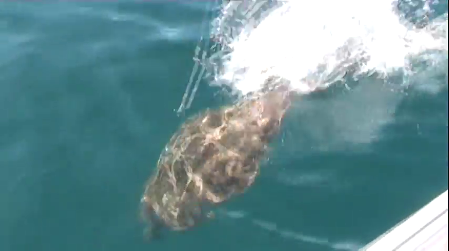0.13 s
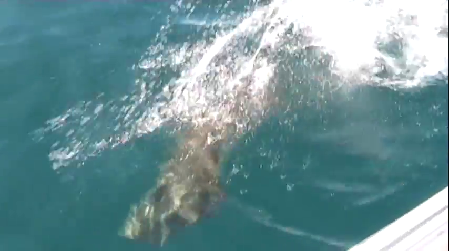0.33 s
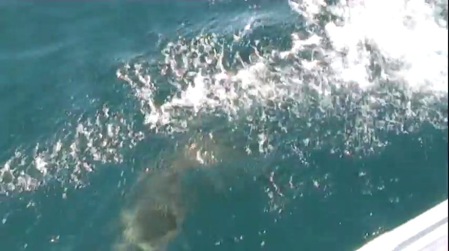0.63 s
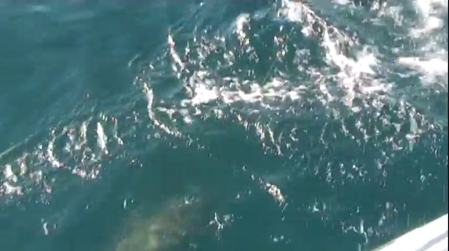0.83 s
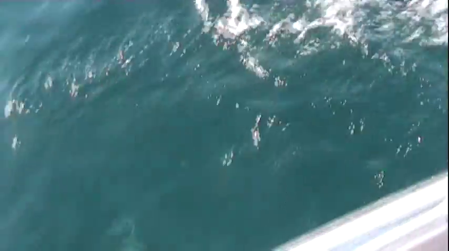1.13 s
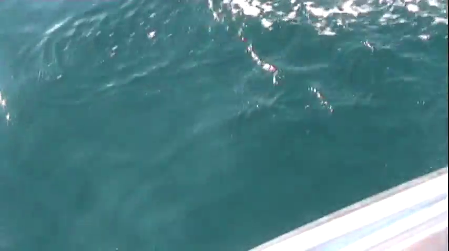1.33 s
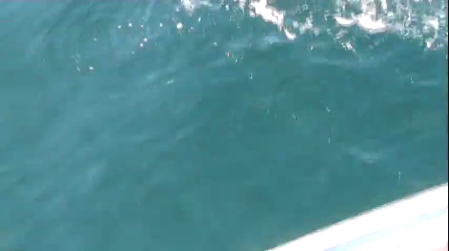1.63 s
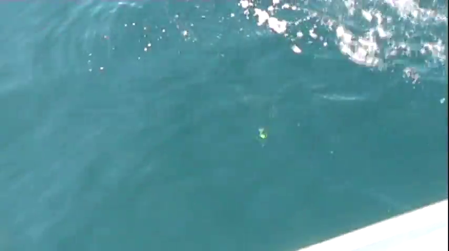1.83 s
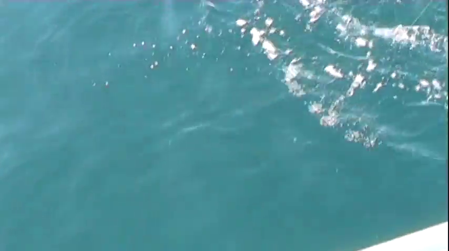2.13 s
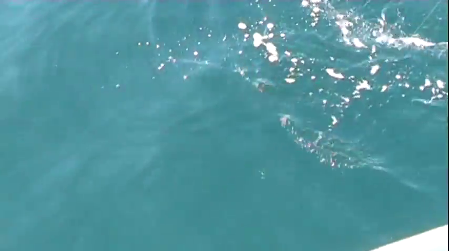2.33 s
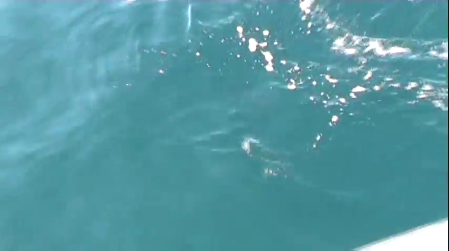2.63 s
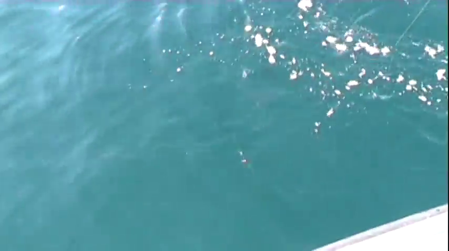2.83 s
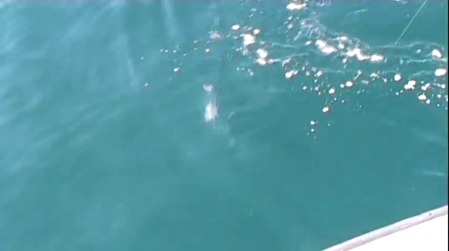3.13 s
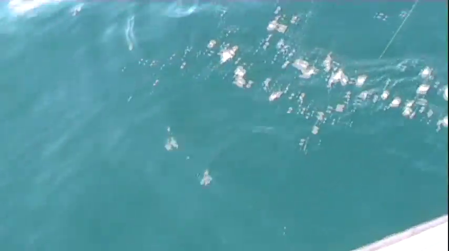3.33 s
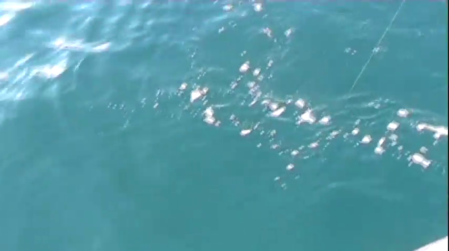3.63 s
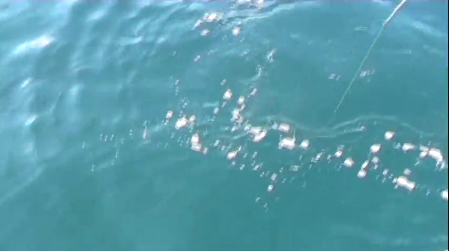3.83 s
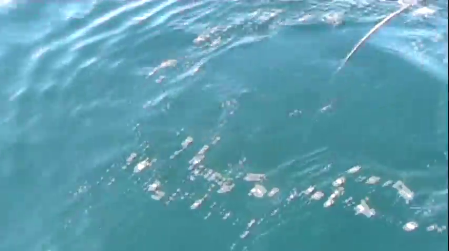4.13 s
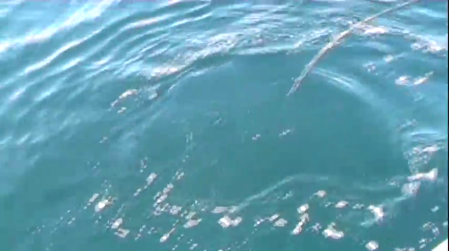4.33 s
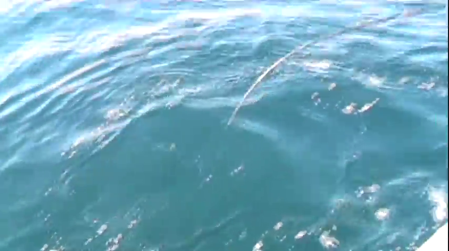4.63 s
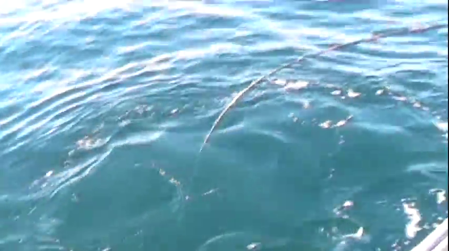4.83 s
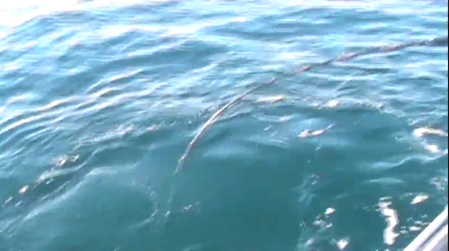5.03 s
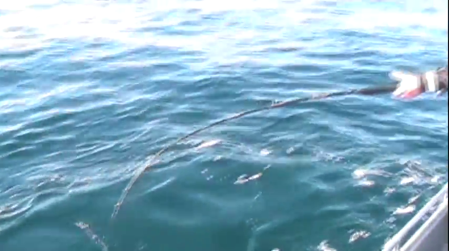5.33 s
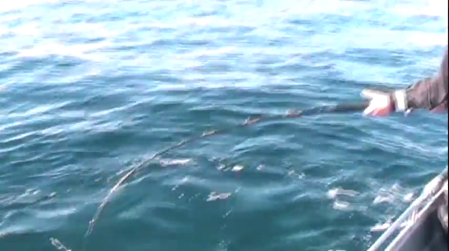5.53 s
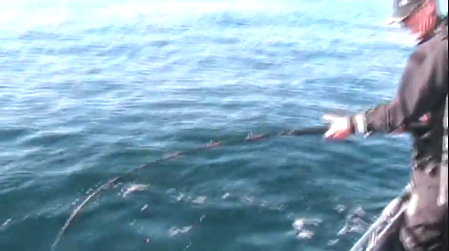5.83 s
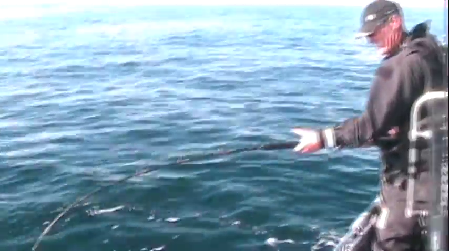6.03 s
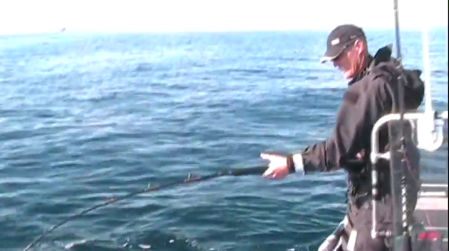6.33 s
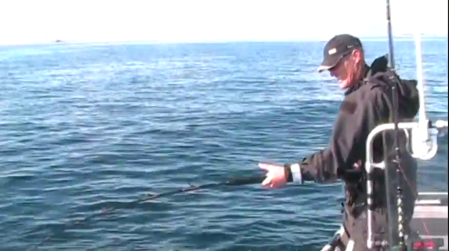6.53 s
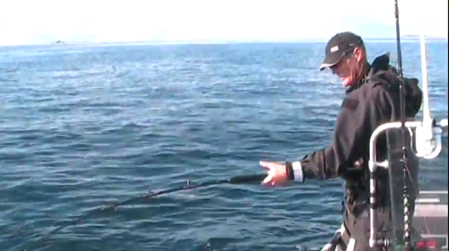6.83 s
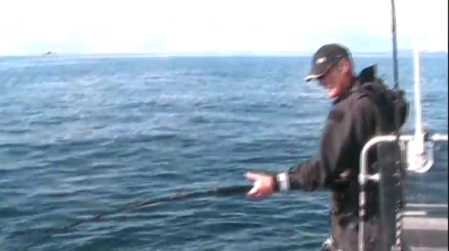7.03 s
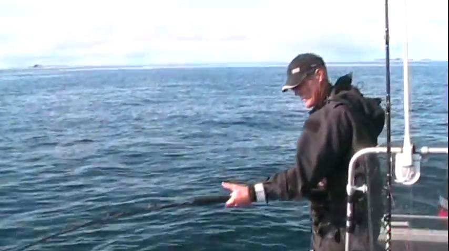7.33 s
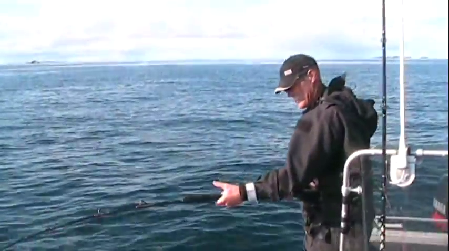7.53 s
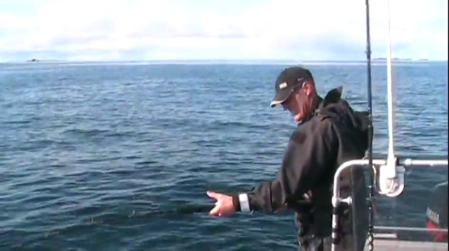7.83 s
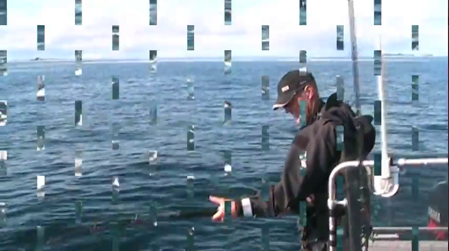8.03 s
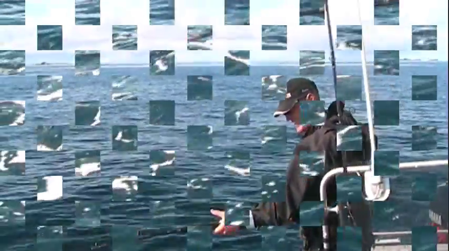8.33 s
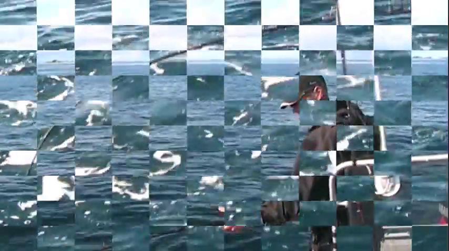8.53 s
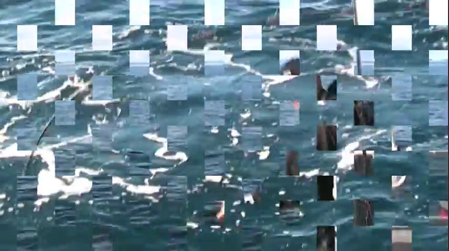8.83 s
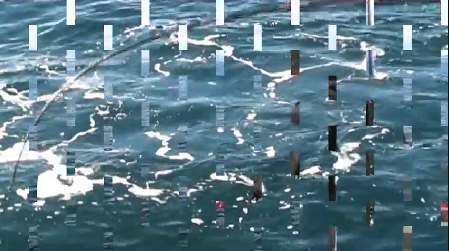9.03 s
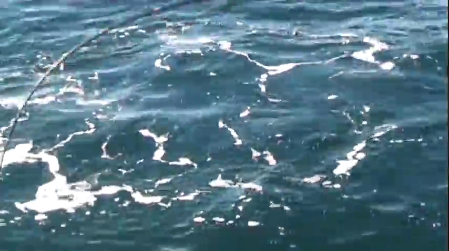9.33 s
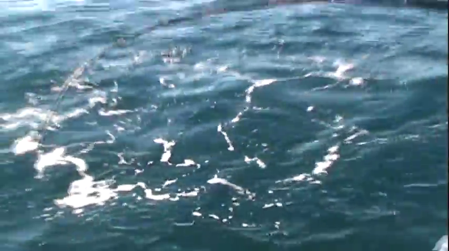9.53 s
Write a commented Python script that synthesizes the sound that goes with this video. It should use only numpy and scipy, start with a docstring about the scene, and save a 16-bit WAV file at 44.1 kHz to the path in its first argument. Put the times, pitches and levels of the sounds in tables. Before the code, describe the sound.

A big fish thrashes and splashes beside a boat, then a fishing reel's ratchet whines in three surging, slowing runs over lapping water.

```python
"""Hooked fish stripping a reel

A big fish thrashes free of the surface beside a boat and dives, pulling line off a reel in three runs.
The reel's pawl snaps over the ratchet teeth, a rattle when slow and a whine when fast: impulses timed by
the spool's speed excite the frame, the housing, the side plate and the spool. Spray of filtered noise falls back,
and small waves of noise, ringing air pockets and a few knocks gulp at the hull, near two close microphone ports."""
import sys
import numpy as np
from scipy import signal
from scipy.fft import rfft, irfft, next_fast_len
from scipy.io import wavfile
from scipy.ndimage import uniform_filter1d, map_coordinates

SR = 44100
rng = np.random.default_rng(int(sys.argv[2]) if len(sys.argv) > 2 else 0)


def store_wav(level_fs):
    """Save 16-bit WAV to argv[1]."""
    pcm = np.round(np.clip(np.atleast_2d(level_fs), -1, 1) * 32767)
    wavfile.write(sys.argv[1], SR, pcm.T.astype(np.int16))


N = 427769
TIME = np.arange(N) / SR

TEETH = 18  # ratchet teeth per turn of the spool
CRUISE_PER_S = 200  # teeth per second at which the exposure levels hold
# the fish's three runs, each a dash and a long coast: (time [s], speed [ratchet teeth per s])
RUNS = [(0.454, 87.2), (0.702, 156.7), (0.858, 236.4), (1.158, 218.9), (1.37, 263.9), (1.546, 253.5),
        (1.679, 286.8), (2.314, 210.7), (2.779, 198.2), (3.052, 164.3), (3.658, 139.5), (4.178, 105.4),
        (4.228, 76.9), (4.28, 117.0), (4.538, 110.2), (4.946, 67.0), (5.538, 68.0), (5.62, 199.6),
        (5.767, 158.9), (5.965, 240.8), (6.246, 280.7), (6.459, 273.5), (7.089, 196.2), (7.79, 116.9),
        (8.312, 71.9), (8.513, 70.9), (8.577, 187.5), (8.716, 148.9), (8.855, 199.3), (9.153, 202.9),
        (9.7, 154.0)]
# loudness of the reel at cruising speed, as it turns and the hand shades it:
# (time [s], snaps [dB], hum [dB], share of the housing's upper resonances [dB])
EXPOSURE = [(.5, -21.5, -32, 11), (1.35, -23.5, -30, 1.5), (1.8, -25, -32.5, 3), (2.2, -24.5, -33, 3),
            (4.4, -24.5, -33, 3), (5.35, -24, -35, 2.5), (5.9, -22.5, -33, 1), (6.55, -23.5, -31.5, 5),
            (7.3, -21.5, -31.5, 5), (8, -21.5, -33.5, 5.5), (8.35, -22.5, -38, 6), (8.53, -25.5, -39, 1),
            (8.6, -27.5, -42, -2), (8.75, -25, -39.5, -2), (9.3, -19.5, -36, 2), (9.7, -19.5, -34, 3)]


def amp(db):
    """Decibels to gain."""
    return 10 ** (np.asarray(db) / 20)


def evened(x):
    """Scales to rms 1."""
    return x / np.sqrt(np.mean(x ** 2) + 1e-20)


def steadied(x, size=3000):
    """Scales to a running rms of about 1, smoothed twice over size samples."""
    power = uniform_filter1d(uniform_filter1d(x ** 2, size), size)
    return x / np.sqrt(abs(power) + 1e-6 * np.mean(x ** 2))


def curve(rows, order=1):
    """One column of a time table at every sample."""
    rows = np.asarray(rows)
    return np.interp(TIME, rows[:, 0], rows[:, order])


def bumps(rows):
    """Sum of bell-shaped bumps."""
    return sum(height * np.exp(-((TIME - s) / width) ** 2) for s, height, width in rows)


def drift(per_s):
    """Smooth random wander of rms 1."""
    knots = np.arange(0, 10, 1 / per_s)
    return evened(np.interp(TIME, knots, rng.standard_normal(len(knots))))


def swells(rows, rise_db_per_s):
    """Gain of overlapping surges that each rise, hold and fade."""
    power = 0
    for s, db, hold, fade in rows:
        before = np.maximum(s - TIME, 0)
        after = np.maximum(TIME - s - hold, 0)
        power = power + amp(db - rise_db_per_s * before - fade * after) ** 2
    return np.sqrt(power)


def read(points, hz):
    """A spectrum on a log-frequency axis."""
    f, value = np.transpose(points)
    return np.interp(np.log(hz + 1), np.log(f + 1), value)


def colour(x, points, size=2048):
    """Causal minimum-phase filter with the given spectrum."""
    db = np.maximum(read(points, abs(np.fft.fftfreq(size, 1 / SR))), -90)
    taps = np.fft.ifft(np.exp(np.conj(signal.hilbert(np.log(amp(db)))))).real
    return signal.oaconvolve(x, taps)[:N]


def sing(x, hz, width):
    """A steep resonance that follows a moving pitch: shift to 0 Hz, smooth, shift back."""
    turn = np.exp(2j * np.pi * np.cumsum(hz) / SR)
    r = np.exp(-np.pi * width / SR)
    smooth = signal.lfilter([(1 - r) ** 2], [1, -2 * r, r * r], x / turn + 1e-18)
    return (turn * smooth).real


def clicks(s, size):
    """Impulses at exact times, placed between samples by a windowed sinc."""
    at = np.clip(s * SR, 0, N + 8)
    near = at.astype(int)[:, None] + np.arange(-3, 5)
    offset = near - at[:, None]
    weight = size[:, None] * np.sinc(offset) * np.sinc(offset / 4)
    return np.bincount(abs(near).ravel(), weight.ravel(), N)[:N]


def add(mix, s, sound):
    """Adds a sound at time s."""
    part = mix[max(round(s * SR), 0):][:len(sound)]
    part += sound[:len(part)]


def scatter(x, t60):
    """A dense, short spray of reflections: decaying noise as an impulse response."""
    t = np.arange(SR // 8) / SR
    tail = rng.standard_normal(len(t)) * amp(-60 * t / t60)
    return signal.oaconvolve(x, tail / np.linalg.norm(tail))[:N]


def rumble():
    """A faint low rumble of filtered noise."""
    # (frequency [Hz], density [dB per Hz])
    rumble_colour = [(20, -5), (70, -7), (130, -5), (250, -9), (600, -22)]
    return amp(-41.0) * evened(colour(rng.standard_normal(N), rumble_colour))


def bubble(hz, t60, rise=0.078):
    """A tone swells within a cycle, rings, and rises in pitch, as an air pocket does nearing the surface."""
    t = np.arange(int(t60 * SR)) / SR
    tone = np.sin(2 * np.pi * hz * t * (1 + rise * t / t60))
    return tone * amp(-60 * t / t60) * (1 - np.exp(-(2 * hz * t) ** 2))


def froth(per_s, spread_db):
    """Countless drops of very unequal size: sparse random impulses."""
    size = amp(spread_db * np.minimum(rng.exponential(1, N), 4))
    return evened(size * rng.standard_normal(N) * (rng.random(N) < per_s / SR))


def gurgle(per_s=220, low_hz=210, high_hz=680, cycles=14, spread_db=2.5, count=14):
    """Many small air pockets in count pitches, each ringing for a number of cycles."""
    water = np.zeros(N)
    for hz in np.geomspace(low_hz, high_hz, count):
        water += signal.oaconvolve(froth(per_s / count, spread_db), bubble(hz, cycles / hz))[:N]
    return evened(water)


def lapping():
    """Water churns along the hull as swelling noise, with ringing air pockets and a few short knocks and ticks."""
    # waves washing along the hull: (arrival [s], relative level [dB], hold [s], fade [dB per s])
    waves = [(.2, -38.5, 0.48, 110), (.98, -33.5, 0.44, 25.5), (2.55, -42, 0.046, 52), (3.7, -43, 0.36, 19),
             (4.84, -44.5, 0.029, 23), (5.75, -44, 0.22, 26), (6.5, -47.5, 0.2, 25), (7.5, -46.5, 0.092, 9),
             (7.97, -48.5, 0.51, 54), (9.1, -48, 0.3, 23)]
    # churning water: (frequency [Hz], density [dB per Hz])
    wash_colour = [(35, -83), (60, -9.5), (167, -2), (347, 2), (404, 2), (530, 3.5), (678, -2.5),
                   (1000, -0.5), (1300, -34), (2200, -120)]
    # air pockets closing in the water, with a few short knocks and ticks:
    # (time [s], peak level [dB], starting pitch [Hz], t60 [s])
    pockets_and_knocks = [(0.03, -7, 3100, 0.0033), (0.055, -11, 2320, 0.013), (.068, -19, 1580, 0.05),
                          (.081, -11, 1130, 0.03), (.116, -16.5, 916, 0.035), (0.181, -19, 417, 0.088),
                          (.197, -7, 550, 0.021), (0.216, -15, 1170, 0.053), (0.252, -11, 1420, 0.032),
                          (0.325, 1.5, 970, 0.019), (0.329, -12, 438, 0.16), (0.354, -10, 374, 0.079),
                          (.357, -8, 544, 0.022), (.366, -10, 1440, 0.039), (.372, -20, 208, 0.091),
                          (.476, -9.5, 994, 0.035), (.513, -17, 1600, 0.036), (.518, -16, 493, 0.068),
                          (.522, -17, 1020, 0.027), (.657, -20, 790, 0.033), (0.767, -18, 396, 0.042),
                          (.823, -7, 3100, .006), (.925, -21, 408, 0.1), (0.942, -16.5, 860, 0.033),
                          (0.973, -13, 383, 0.041), (1.035, -19, 480, 0.064), (1.07, -21, 420, 0.12),
                          (1.121, -22.5, 452, 0.15), (1.175, -22, 407, 0.13), (1.196, -24, 484, 0.06),
                          (1.238, -12, 1950, .012), (1.255, -25, 302, .08), (1.326, -18.5, 460, 0.035),
                          (2.039, -34, 238, 0.12), (2.553, -29, 840, 0.061), (2.62, -37, 166, 0.16),
                          (2.7, -29.5, 404, 0.2), (3.836, -13, 1130, 0.011), (3.837, -14, 463, 0.012),
                          (4.837, -18, 450, 0.055), (4.844, -15.5, 381, 0.098), (4.85, -34, 230, 0.12),
                          (5.839, -23.5, 484, 0.06), (6.588, -29, 540, 0.099), (6.595, -32, 410, .07),
                          (7.96, -31, 192, 0.19), (7.985, -27, 241, 0.14), (8.08, -42, 138, 0.39),
                          (8.357, -38, 413, 0.073), (8.435, -35, 260, 0.16), (8.44, -42, 560, 0.074),
                          (9.06, -25, 380, 0.081), (9.073, -29, 312, 0.12), (9.287, -31, 412, 0.15),
                          (9.295, -30, 720, .07)]
    churn = evened(colour(froth(per_s=2000, spread_db=-1.0), wash_colour))
    surge = swells(waves, rise_db_per_s=74) + amp(-53)  # never fully calm
    water = (amp(-3.5) * churn + amp(-9.0) * gurgle()) * surge * amp(2 * drift(25))
    gulps = np.zeros(N)
    for s, db, hz, t60 in pockets_and_knocks:
        add(gulps, s, amp(db) * bubble(hz, t60))
    return water + gulps + amp(-2) * scatter(gulps, t60=0.072)


def splash():
    """The tail slaps and throws up spray; the spray patters back and its larger drops plink."""
    # sheets of spray thrown up and falling back:
    # (arrival [s], relative level [dB], hold [s], fade [dB per s])
    sheets = [(.075, -32, 0.012, 85), (.21, -26, 0.18, 106), (.49, -25.5, 0.24, 135), (.8, -38, .01, 5)]
    # slaps of the tail: (time [s], level before colouring [dB], t60 [s])
    slaps = [(0.051, -18.5, 0.039), (.197, -26, 0.12), (0.211, -10, 0.039), (0.316, -17.5, 0.18),
             (0.325, -12, 0.078), (0.356, -21, 0.38), (0.47, -19.5, 0.12)]
    # slaps and spray: (frequency [Hz], density [dB per Hz])
    spray_colour = [(59, -38), (100, -50), (426, -6.5), (646, -21), (1040, -5), (1290, -10), (2750, -12.5),
                    (4900, -21), (7890, -17), (11500, -36.5), (15000, -98), (22000, -120)]
    spray = swells(sheets, rise_db_per_s=183)
    water = froth(per_s=7000, spread_db=-0.3) * spray * amp(3.0)
    t = TIME[:SR // 4]
    for s, db, t60 in slaps:
        add(water, s, amp(db - 60 * t / t60) * rng.standard_normal(len(t)))
    drops = gurgle(per_s=900, low_hz=520, high_hz=3520, cycles=22, spread_db=2.0, count=17)
    return evened(colour(water, spray_colour)) * np.std(water) + amp(-8.0) * spray * drops


def line():
    """Line hisses softly through the rod's guides, as filtered noise fading in once it is taut."""
    # plainer once the rod points across the microphones: (time [s], level [dB])
    hiss_level = [(4, -46), (5.5, -44), (7, -41), (8.5, -41)]
    # (frequency [Hz], density [dB per Hz])
    hiss_colour = [(900, -30), (1500, -3), (2500, 0), (6000, 0), (9000, -3), (12000, -14)]
    hiss = evened(colour(rng.standard_normal(N), hiss_colour))
    return amp(curve(hiss_level) + drift(20)) * hiss * np.clip(TIME - RUNS[0][0], 0, 1)


def spool_speed():
    """Teeth per second: the run, a jerk at each tail beat, and a drag that grips and eases once per turn."""
    # tail beats that jerk the spool, mostly as a run begins:
    # (time [s], extra speed [teeth per s], half width [s])
    tail_beats = [(0.77, 105, 0.061), (0.921, 42, 0.038), (1.035, 78, 0.064), (1.234, 97, 0.064),
                  (1.45, 63, 0.049), (1.614, 38, 0.053), (5.394, 38, 0.107), (5.888, 78, 0.04),
                  (5.99, 12, 0.03), (6.052, -30, 0.022), (6.122, 62, 0.033), (6.341, 36, 0.03)]
    # (time [s], swing of the drag [teeth per s], place in the turn [turns])
    drag_grip = [(.7, 2, .03), (1.7, 6, -.25), (2.3, 9.5, -.37), (3.1, 12, -.33), (4, 7, -.39),
                 (5.2, 4.6, -.35), (6.2, 4, -.88), (6.8, 8, -.95), (7.4, 16, -1.02), (8.3, 3, -.73),
                 (9, 21, -.87), (9.3, 4, -1.03), (9.65, 20, -.84)]
    pull = curve(RUNS) + bumps(tail_beats)
    turns = np.cumsum(pull * (TIME > RUNS[0][0])) / SR / TEETH
    drag = curve(drag_grip) * np.cos(2 * np.pi * (turns + curve(drag_grip, order=2)))
    return (pull + drag) * (1 + .007 * drift(30))


def ratchet(speed, swing_db=0.14, uneven_db=1.2, jitter_s=.000006, rebound_s=.0038, slow_hz=75,
            rebound_db=-2, rebound_jitter=0.07, rebound_fade=0.6):
    """The pawl drops off each tooth and strikes again, sooner and weaker as the spool speeds up."""
    passed = np.cumsum(speed * (TIME > RUNS[0][0])) / SR
    tooth = np.arange(1, int(passed[-1]))
    s = np.interp(tooth, passed, TIME)
    slowness = slow_hz / np.interp(s, TIME, speed)
    a, b, c, d = rng.standard_normal((len(s), 4)).T
    off_centre = swing_db * np.cos(2 * np.pi * tooth / TEETH)  # once per turn of the spool
    force = amp(uneven_db * a + off_centre)
    again = s + rebound_s * np.sqrt(slowness) * (1 + rebound_jitter * slowness * c)
    rebound_force = force * slowness ** rebound_fade * amp(rebound_db + uneven_db * d)
    return clicks(s + jitter_s * b, force), clicks(again, rebound_force)


def chatter(hits, t60):
    """Each hit frays into a decaying burst of tiny contacts, never twice the same."""
    keep = amp(-120 / (t60 * SR))  # decay of power per sample
    return np.sqrt(signal.lfilter([1 - keep], [1, -keep], hits ** 2)) * rng.standard_normal(N)


def disperse(x, delay_s=0.000901, size=2048, count=70):
    """Bending waves cross the frame at unequal speeds, which smears each blow without colouring it."""
    spread = delay_s * np.minimum(rng.exponential(1, count), 4)
    delays = np.interp(np.linspace(0, count - 1, size // 2 + 1), np.arange(count), spread)
    phase = -2 * np.pi * np.cumsum(delays) * SR / size
    taps = np.roll(irfft(np.exp(1j * phase)), size // 4)
    return signal.oaconvolve(x, taps)[size // 4:][:N]


def rattle(x, peak_s, count=4):
    """The frame answers each blow with a dense ring of a few milliseconds, whose detail shifts as the reel moves."""
    u = np.arange(SR // 25) / SR / peak_s
    answers = rng.standard_normal((count, len(u))) * np.sqrt(u) * np.exp(-u / 2)
    weights = np.array([drift(1.458) for _ in answers])
    weights /= np.linalg.norm(weights, axis=0)
    ringing = np.zeros(N)
    for weight, answer in zip(weights, answers):
        ringing += weight * signal.oaconvolve(x, answer / np.linalg.norm(answer))[:N]
    return ringing


def pawl_snaps(blows, fray, pace):
    """Frayed blows spread through the frame and radiate brightly, coloured by how the reel is held."""
    # how the reel is held: (time [s], pose [index into the five colours below])
    turns = [(1.6, 0), (2, 1), (2.62, 1), (2.82, 2), (5.45, 2), (5.75, 3), (8.3, 3), (8.9, 4)]
    # colours of the snaps as the reel turns towards the microphones: (frequency [Hz], density [dB per Hz])
    early = [(1590, -41), (2700, -7.5), (3020, -8), (3300, -11), (3930, -9.5), (4500, -1.5), (5210, -6.5),
             (5950, -4), (6300, -6), (7250, -2), (8250, -0.5), (9200, -9.5), (10800, -16), (11400, -38),
             (14300, -113), (22000, -120)]
    diving = [(1590, -30), (2700, -10.5), (3050, -12), (3840, -11), (4470, -3.5), (4700, -2.5),
              (5200, -8.5), (6050, 5.5), (6580, -8.5), (8230, -2.5), (9360, -7.5), (10300, -13),
              (13400, -103), (22000, -120)]
    aside = [(1590, -22), (2750, -10.5), (3090, -8.5), (3460, -8), (3770, -10), (4270, -7), (4750, -6),
             (5400, -3.5), (6000, -1.5), (6790, -3), (7780, -1), (11000, -17.5), (14300, -104),
             (22000, -120)]
    facing = [(1590, -17), (2650, -8), (3010, -10.5), (3400, -10), (4280, -8), (4950, -7.5), (5590, -5),
              (7120, 1), (8600, -1), (9100, -5.5), (10200, -8.5), (11600, -19), (15000, -72), (22000, -120)]
    late = [(1590, -21.5), (2700, -11), (3240, -16), (3800, -9), (4800, -3.5), (5290, -8.5), (6700, -4.5),
            (7150, 4.5), (7800, 3), (8250, -3), (8600, 5), (9820, -12.5), (10600, -5.5), (11600, -23.5),
            (15000, -102), (22000, -120)]
    frayed = disperse(blows) + amp(-3) * fray * chatter(blows, t60=.03)
    rough = frayed + amp(-7.5) * rattle(frayed, peak_s=.0008, count=4)
    pose, snaps = curve(turns), np.zeros(N)
    for k, shape in enumerate([early, diving, aside, facing, late]):
        snaps += np.maximum(1 - abs(pose - k), 0) * evened(colour(rough, shape))
    snaps = signal.lfilter(*signal.butter(4, 880, "high", fs=SR), snaps)  # the small frame radiates no bass
    slope_db = 16  # growth with a tenfold speed
    return amp(curve(EXPOSURE) + slope_db * pace + 0.52 * drift(35)) * steadied(snaps)


def ring(x, modes, wander=.028, wander_db=2.2, per_s=9):
    """Steep resonances that wander in pitch and strength as the rod flexes; neighbours swing in opposite senses."""
    total = np.zeros(N)
    for k, (hz, width, db) in enumerate(modes):
        gain = (-1) ** k * amp(db + wander_db * drift(per_s))
        total += gain * sing(x, hz * (1 + wander * drift(per_s)), width)
    return total


def housing_hum(drop, rebound, fray, speed, pace):
    """The blows push the housing, which hums at its resonances; the upper ones open up with speed."""
    # lower and upper resonances: (pitch [Hz], width [Hz], relative level [dB])
    housing_low = [(1245, 230, 0)]
    housing_high = [(1830, 640, 0), (2230, 440, -1.5)]
    # brief swells and dips of the hum: (time [s], extra level [dB], half width [s])
    surges = [(.97, 2, 0.051), (1.2, 2, 0.062), (1.32, -2, 0.054), (1.52, 1.5, 0.046), (1.77, 3.5, 0.076),
              (1.96, 3, 0.046), (2.44, 2, 0.17), (6.15, 0.5, .13), (6.35, -0.5, 0.029), (6.46, 2, 0.061),
              (6.57, 1.5, 0.03), (6.76, 0.5, 0.037), (7.05, 1, 0.29), (9.31, 3.5, 0.055)]
    push = drop + amp(-7) * rebound + amp(-3.5) * fray * chatter(drop + rebound, t60=.035)
    push += amp(-8) * rattle(push, peak_s=.0007, count=5)
    slope_db, open_slope_db = 14.5, 20.5  # growth with a tenfold speed: whole hum, upper share
    upper_gain = amp(curve(EXPOSURE, order=3) + open_slope_db * pace)
    hum = steadied(ring(push, housing_low)) - upper_gain * steadied(ring(push, housing_high))
    # the housing radiates little outside this band
    hum = signal.sosfilt(signal.cheby1(3, 1, (1060, 2480), "band", fs=SR, output="sos"), hum)
    rod = steadied(ring(drop, [(514, 220, 0)]))
    hum += amp(-16.0) * rod * speed / CRUISE_PER_S  # the rod joins in at speed
    level_db = curve(EXPOSURE, order=2) + slope_db * pace + bumps(surges) + 1.0 * drift(30)
    return amp(level_db) * steadied(hum)


def plate_and_spool(drop, rebound, fray):
    """Rebounds ring the side plate and drops ring the spool, each at its own moving pitch."""
    # how freely the metal rings: (time [s], side plate [dB], spool [dB])
    metal_level = [(.7, -31.5, -43), (1, -33, -34), (1.35, -60, -26), (1.6, -38, -36), (2, -35.5, -38),
                   (2.55, -43, -27.5), (2.8, -34, -37), (3.5, -35.5, -33.5), (4.1, -36.5, -37),
                   (4.55, -39, -30.5), (5, -37.5, -37.5), (5.5, -39, -42), (5.9, -34.5, -34),
                   (6.5, -39.5, -33.5), (7.1, -44.5, -33), (7.5, -37.5, -32), (8.3, -49, -44),
                   (8.8, -41, -40), (9.1, -39.5, -37), (9.5, -37.5, -30)]
    # the side plate's ring shifts with the grip of the hand: (time [s], pitch [Hz])
    plate_hz = [(.9, 2960), (1.7, 3090), (3, 3130), (5.2, 3100), (6.4, 3020), (7.7, 3050), (8.5, 3200),
                (9.6, 3180)]
    # the spool's ring wanders as line leaves it: (time [s], pitch [Hz])
    spool_hz = [(.8, 4730), (1.1, 4640), (1.3, 4690), (1.48, 4760), (1.9, 4720), (2.5, 4660), (3, 4730),
                (4.3, 4770), (4.8, 4860), (5.5, 4900), (7.3, 4950), (9, 4760), (9.5, 4780)]
    knock = amp(-6) * fray * chatter(drop + rebound, t60=.04)
    plate = steadied(sing(rebound + knock, curve(plate_hz), width=230))
    spool = steadied(sing(drop + knock, curve(spool_hz), width=200))
    return amp(curve(metal_level)) * plate + amp(curve(metal_level, order=2)) * spool


def reel():
    """The pawl's blows snap brightly, hum in the housing and ring the plate and the spool."""
    # fraying of the blows, ragged while the fish jerks the spool and cleaner as it coasts:
    # (time [s], relative level [dB])
    fraying = [(.7, -1), (1.5, -3), (1.75, -8), (2.6, -8), (3.2, -6), (4.5, -7), (5.5, -6), (5.7, -3),
               (6.25, -3), (6.5, -7), (7.2, -6), (8.2, -3), (8.6, -2), (9.1, -8), (9.7, -6)]
    speed = spool_speed()
    pace = np.log10(speed / CRUISE_PER_S)
    drop, rebound = ratchet(speed)
    fray = amp(curve(fraying))
    snaps = pawl_snaps(drop + rebound, fray, pace)
    metal = housing_hum(drop, rebound, fray, speed, pace) + plate_and_spool(drop, rebound, fray)
    taut = np.clip((TIME - RUNS[0][0]) / 0.33, 0, 1)  # the line takes up the load
    return snaps * np.minimum(4 * taut, 1) + metal * taut


def reflected(x):
    """Adds one reflection off the boat with a slowly changing delay, which sweeps the colour."""
    # the path changes as angler and microphones move: (time [s], delay [s])
    echo_delay = [(1, .00345), (2, .003), (3, .0032), (5.4, .00322), (6.6, .00325), (8, .00335),
                  (9.7, .00345)]
    return x + amp(-12.5) * map_coordinates(x, [(TIME - curve(echo_delay)) * SR], order=3)


def ports(x, difference, lag):
    """The ports differ by a part lagging a fixed phase (radians), which parts the treble; the deck reflects faintly."""
    size = next_fast_len(N)
    gain = amp(read(difference, np.fft.rfftfreq(size, 1 / SR)))
    side = irfft(rfft(x, size) * gain * np.exp(-1j * lag), size)[:N]
    return np.array([port + amp(-16) * scatter(port, t60=.08) for port in (x + side, x - side)])


def scene():
    """Reel and water, over a faint rumble that is opposite in the two ports."""
    # difference of the ports against their sum, for sound from the side and from nearer the front:
    # (frequency [Hz], level [dB])
    ports_side = [(1100, -13), (2200, -10.5), (3600, -4), (4600, -4.5), (6000, -0.5), (8000, 1.5),
                  (9500, 9), (11000, 18.5)]
    ports_front = [(1100, -16.5), (2200, -22), (3600, -7), (6000, -3), (8500, 1.5), (11000, 9.5)]
    low = rumble()
    water = lapping() + splash()
    whine = line() + reflected(reel())
    facing = np.interp(TIME, (5, 6), [0, 1])  # the microphones swing round to the reel (s)
    from_side = ports(whine * (1 - facing), ports_side, lag=1.38)
    from_front = ports(whine * facing + water, ports_front, lag=1.45)
    return from_side + from_front + np.array([low, -low])


def record(dry):
    """Clips at full scale, then removes everything above the band edge."""
    edge_hz = 11822
    lowpass = signal.firwin(511, edge_hz, window=("kaiser", 9), fs=SR)
    return signal.oaconvolve(np.clip(dry, -1, 1), lowpass[None], "same")


dry = scene()
out = record(dry)
store_wav(out)
```